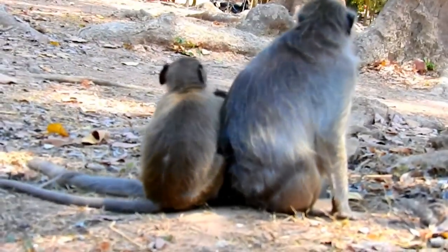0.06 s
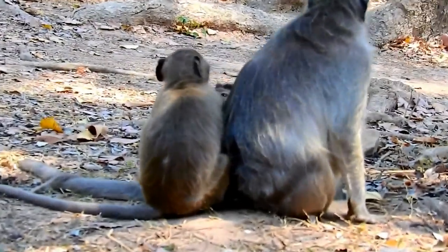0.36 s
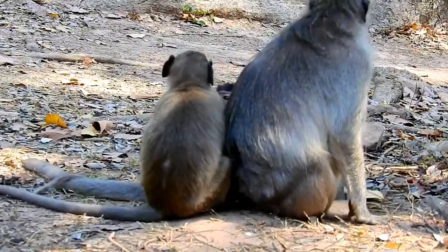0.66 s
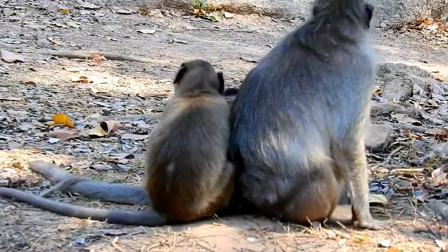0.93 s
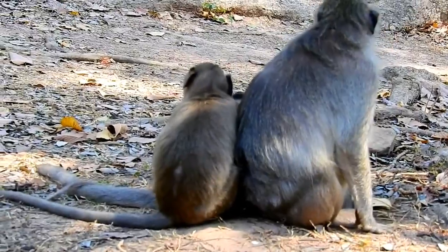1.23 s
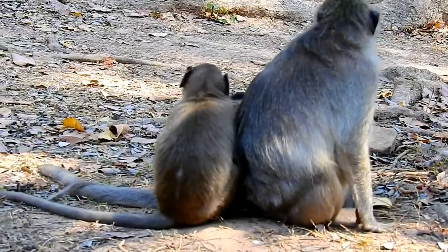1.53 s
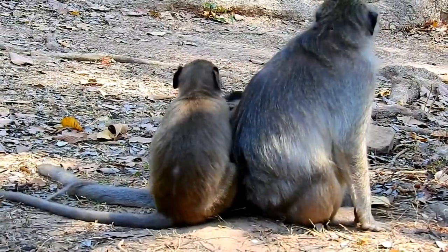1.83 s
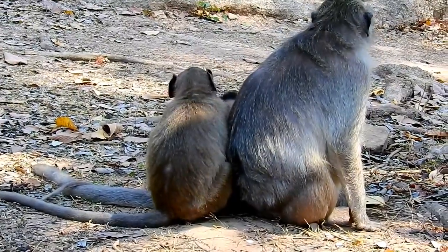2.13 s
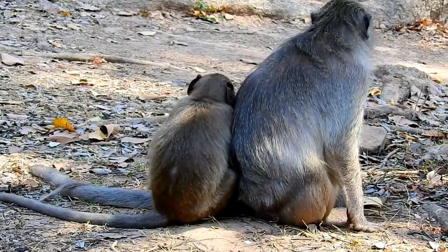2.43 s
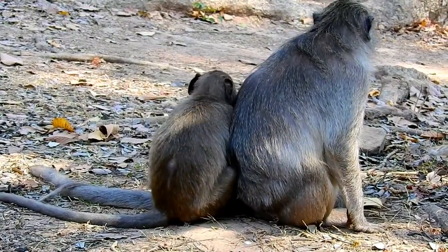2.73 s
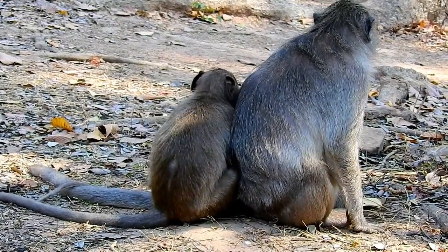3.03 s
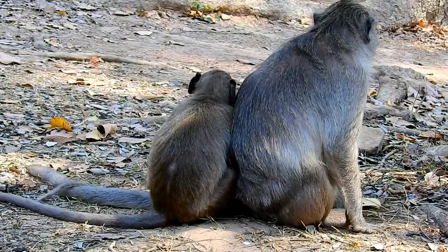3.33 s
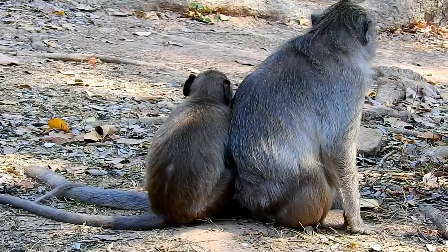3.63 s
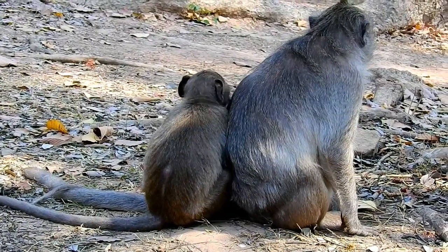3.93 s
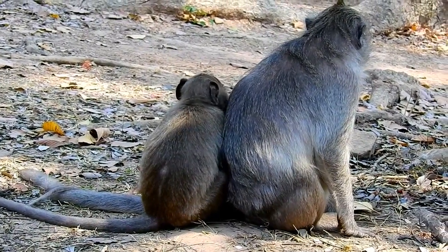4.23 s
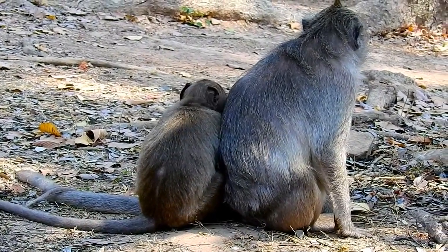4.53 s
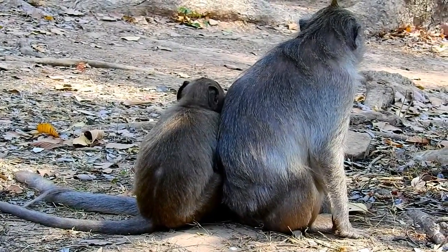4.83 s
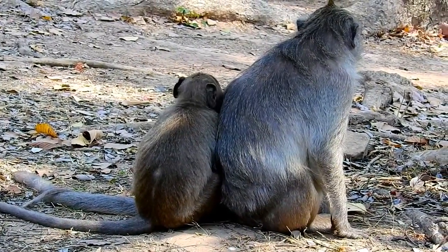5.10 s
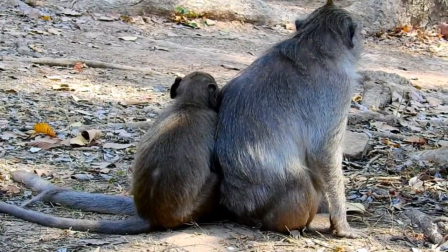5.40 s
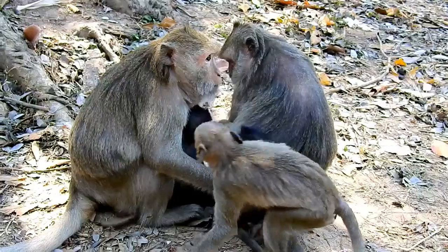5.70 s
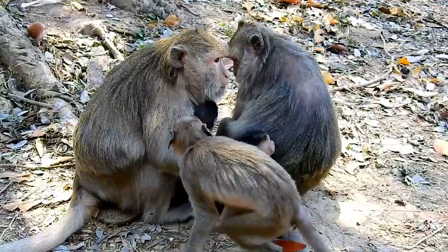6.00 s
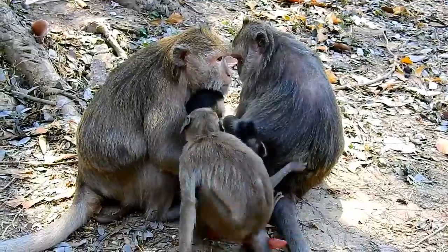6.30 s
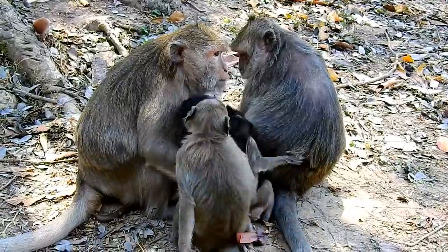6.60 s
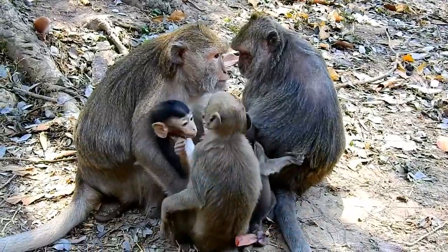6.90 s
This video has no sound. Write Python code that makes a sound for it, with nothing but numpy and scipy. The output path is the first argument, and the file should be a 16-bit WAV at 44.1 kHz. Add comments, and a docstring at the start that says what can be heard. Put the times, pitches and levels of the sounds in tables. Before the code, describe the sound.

A high, steady cicada chorus with distant traffic rumble, joined by one pulsing cicada close by and a brief crackle of leaves.

```python
"""Cicadas drone in a forest, their tymbal clicks blurring among the trees; one whines steadily.
A far road rumbles, an engine recedes, one thin coo sounds and a macaque shifts on dry leaves.
From 3.7 s a near cicada pumps its abdomen, throbbing between a low and a high buzz.
After a short silence the scene goes on at 5.7 s from a second spot, under that cicada.
There a young monkey scuffs the ground and a dry leaf snaps."""
import sys
import numpy as np
from scipy import signal
from scipy.fft import rfft, irfft, next_fast_len
from scipy.io import wavfile
from scipy.ndimage import uniform_filter1d, map_coordinates

SR = 44100
rng = np.random.default_rng(int(sys.argv[2]) if len(sys.argv) > 2 else 0)


def log_audio(samples):
    """Write samples as a 16-bit WAV file to the path given in sys.argv[1]."""
    # one column per channel
    frames = np.atleast_2d(samples).T
    # limit to full scale, then quantise
    limited = np.clip(frames, -1, 1)
    pcm = np.round(limited * 32767).astype(np.int16)
    wavfile.write(sys.argv[1], SR, pcm)


N = 315312


def amp(db):
    return 10 ** (np.asarray(db) / 20)


def unit_rms(x):
    return x / np.sqrt(np.mean(x ** 2) + 1e-20)


def time_s():
    return np.arange(N) / SR


def log_interp(points, hz):
    """Interpolate (freq_hz, value) points on a log axis."""
    freq_hz, values = np.transpose(points)
    return np.interp(np.log(hz + 1), np.log(freq_hz + 1), values)


def gate(start_s, end_s, fade_s):
    """One between two times, with linear fades."""
    return np.clip(np.minimum(time_s() - start_s, end_s - time_s()) / fade_s, 0, 1)


def wobble(rate_hz):
    """Smooth random curve, rate_hz knots a second."""
    knots = rng.standard_normal(4096)
    grid_s = np.linspace(0, N / SR, 4096)
    return np.interp(time_s(), grid_s, map_coordinates(knots, [grid_s * rate_hz], mode="wrap"))


def wave_db(mean_db, swing_db, crest_s, period_s):
    """Slow cosine rise and fall in level."""
    return mean_db + swing_db * np.cos(2 * np.pi * (time_s() - crest_s) / period_s)


def bump(centre_s, half_length_s):
    """Gaussian of height one."""
    return np.exp(-np.minimum(np.abs(time_s() - centre_s) / half_length_s, 10) ** 2)


def filtered(x, response):
    """Apply a gain given as a function of frequency."""
    size = next_fast_len(N + SR // 4, real=True)
    return irfft(rfft(x, size) * response(np.fft.rfftfreq(size, 1 / SR)), size)[..., :N]


def colour(points):
    """Response through (freq_hz, gain_db) points, rolled off below the first."""
    return lambda hz: amp(log_interp(points, hz)) * np.minimum(hz / points[0][0], 1) ** 2


# Stereo width at each spot, side relative to mid: freq_hz, side_db
FIRST_WIDTH = [(60, -20), (100, -24), (180, -22.5), (310, -16.5), (530, -14.5), (910, -12.5), (1560, -13.5),
               (2680, -14), (4610, -8.5), (7940, 0)]
SECOND_WIDTH = [(60, -21.5), (100, -21), (180, -20.5), (310, -16), (530, -13.5), (910, -13), (1560, -12),
                (2680, -15.5), (4610, -8.5), (7940, -2.5)]

def stereo(pair, response, width):
    """Two unrelated signals to filtered left and right, with a mid of rms 1."""
    def gains(hz):
        return response(hz) * np.array([np.ones_like(hz), amp(log_interp(width, hz))])
    mid, side = filtered(pair, gains)
    return np.array([mid + side, mid - side]) / np.std(mid)


# Time at each listening spot: start_s, end_s
SPOT_TIMES = [(0, 5.203), (5.702, 7.2)]

def at_first_spot():
    return time_s() < SPOT_TIMES[1][0]


def tymbal(rate_hz, waver, jitter_s):
    """One cicada's click train, slightly uneven in time and size."""
    cycles = np.cumsum(rate_hz * (1 + waver * (wobble(3) + wobble(40)))) / SR
    position = np.interp(np.arange(1, cycles[-1]), cycles, np.arange(N))
    slip, spread = rng.standard_normal((2, 4096))[:, :len(position)]
    position = np.clip(position + jitter_s * SR * slip, 0, N - 2)
    size = amp(2 * spread)
    index, fraction = position.astype(int), position % 1
    return np.bincount(index, size * (1 - fraction), N) + np.bincount(index + 1, size * fraction, N)


def tree_scatter(clicks, t60_s, direct_ratio):
    """Trunks and leaves scatter clicks into mid and side; the direct sound is in the mid."""
    t = np.arange(SR // 4) / SR
    tail = rng.standard_normal((2, len(t))) * amp(-60 * t / t60_s)
    tail[0, 0] += direct_ratio * np.linalg.norm(tail[0])
    tail /= np.linalg.norm(tail, axis=1, keepdims=True)
    padded = np.pad(clicks, (len(t), 0), "wrap")[None]
    return unit_rms(signal.fftconvolve(padded, tail, "valid", axes=1)[:, :N])


def swarm(rate_hz, direct_ratio, count):
    """Far cicadas, each clicking at its own rate."""
    trains = (tymbal(hz, waver=.04, jitter_s=.0002994) for hz in rate_hz * np.linspace(.8, 1.2, count))
    return sum(tree_scatter(clicks, t60_s=.29, direct_ratio=direct_ratio) for clicks in trains)


# Surges and lulls: centre_s, gain_db, half_length_s
DRONE_SURGES = [(.4, 0.5, 0.29), (1.7, -1, 0.26), (2.301, 2, 0.024), (2.42, 0.5, .04), (2.537, 2.8, 0.02),
                (2.7, 1, 0.032), (3.38, -1, 0.21), (3.899, 1, 0.15), (4.57, 1, 0.039), (5.049, 1, 0.29)]

def surge_db():
    """The droning cicadas briefly push harder or ease off together."""
    return sum(gain_db * bump(centre_s, half_s) for centre_s, gain_db, half_s in DRONE_SURGES)


# Chorus spectra: freq_hz, gain_db
DRONE_SPECTRUM = [(1000, -48), (1400, -27), (1640, -12), (1790, -7.5), (1900, -19), (2150, -19.5),
                  (2500, -19.5), (2900, -13.5), (3150, -6), (3420, 0.5), (3640, -0.5), (3750, -8.5),
                  (4000, -18), (4600, -51)]
SHRILL_SPECTRUM = [(3200, -38), (4020, -5.5), (4130, -6), (4350, -4.5), (4700, -7.5), (5050, -1.5),
                   (5300, -2), (5700, -5), (6400, -3.5), (6950, -2.5), (7300, -8.5), (8100, -16.5),
                   (8800, -25), (11000, -36.5), (15000, -61.5)]
CANOPY_SPECTRUM = [(1000, -36.5), (1450, -17.5), (1750, -8), (2200, -19), (2700, -15), (3300, -2),
                   (3950, -11.5), (4300, -8.5), (5100, -1), (5750, -6), (6850, -2.5), (8700, -26.5),
                   (11000, -38), (15000, -51)]

def cicada_chorus():
    """A droning and a shrill kind swell separately; at the second spot they blend overhead."""
    slow = swarm(rate_hz=230, direct_ratio=.83, count=4)
    fast = swarm(rate_hz=250, direct_ratio=.63, count=6)
    drone_db = wave_db(-33, swing_db=.1, crest_s=.5, period_s=12.5) + surge_db() + .62 * wobble(21.82)
    shrill_db = wave_db(-31.5, swing_db=1.36, crest_s=.24, period_s=5) + .23 * wobble(14)
    canopy_db = wave_db(-26.5, swing_db=-.5, crest_s=8, period_s=6.5)
    drone = amp(drone_db) * stereo(slow, colour(DRONE_SPECTRUM), FIRST_WIDTH)
    shrill = amp(shrill_db) * stereo(fast, colour(SHRILL_SPECTRUM), FIRST_WIDTH)
    canopy = amp(canopy_db) * stereo(fast, colour(CANOPY_SPECTRUM), SECOND_WIDTH)
    return np.where(at_first_spot(), drone + shrill, canopy)


def peaks(rows):
    """Response of narrow peaks with notches between them."""
    return lambda hz: sum((-1) ** k * amp(gain_db) / (1 + ((hz - centre_hz) / half_width_hz) ** 2)
                          for k, (centre_hz, half_width_hz, gain_db) in enumerate(rows))


# Peaks of the whine, most about 100 Hz apart, with notches between them as from a short echo:
# centre_hz, half_width_hz, gain_db
WHINE_PEAKS = [(3477, 40, -4), (3571, 40, 0.5), (3662, 40, -6), (3775, 40, -9), (3885, 40, -10),
               (3970, 40, -9.5), (4330, 70, -13), (5330, 110, -11)]
# Peak of the undertone: centre_hz, half_width_hz, gain_db
UNDERTONE_PEAK = [(1790, 64, 0)]

def whining_cicada():
    """Uneven clicks blur into a fluttering whine; at the first spot an undertone grows an octave below."""
    flutter_hz, flutter_depth_db, rise_db_per_s = 36.85, 2.1, 1.17
    t = time_s()
    clicks = tree_scatter(tymbal(rate_hz=280, waver=.04, jitter_s=.0006), t60_s=.25, direct_ratio=2)
    flutter_db = flutter_depth_db * np.sin(2 * np.pi * flutter_hz * t + 2 * wobble(8))
    whine_db = np.where(at_first_spot(), -33.7, -35.5) + surge_db() + flutter_db
    undertone_db = -48.5 + rise_db_per_s * t + flutter_db
    whine = amp(whine_db) * stereo(clicks, peaks(WHINE_PEAKS), FIRST_WIDTH)
    undertone = amp(undertone_db) * stereo(clicks, peaks(UNDERTONE_PEAK), FIRST_WIDTH)
    return whine + at_first_spot() * undertone


def distant_noise(depth_db):
    """Two noises whose narrow bands come and go, as over a long path."""
    spectra = signal.stft(rng.standard_normal((2, N)), nperseg=2048)[2]
    fading = uniform_filter1d(rng.standard_normal(spectra.shape[1:]), size=3, axis=0)
    fading = uniform_filter1d(fading, size=6, axis=1)
    return signal.istft(spectra * amp(depth_db * unit_rms(fading)), nperseg=2048)[1][:, :N]


# Road spectrum at each spot: freq_hz, gain_db
FIRST_RUMBLE = [(20, -28.5), (40, -13), (58, -3), (80, -4.5), (120, 0.34), (170, -4.5), (260, -11.5),
                (360, -18.5), (600, -26), (800, -23), (950, -27), (1300, -22), (2500, -31), (6000, -68)]
SECOND_RUMBLE = [(20, -33), (45, -9.5), (62, -2.5), (90, 0), (156, -2.5), (200, -7.5), (290, -10),
                 (400, -19.5), (600, -19.5), (820, -19.5), (960, -22), (1300, -24), (2500, -39),
                 (6000, -64.5)]
# Engine tones: start_s, end_s, pitch_hz, level_db
ROAD_TONES = [(0, 5.3, 59, -45.5), (0, 5.3, 123, -47), (0, 2.4, 246, -53), (0, .18, 505, -51),
              (1.18, 1.36, 450, -52), (2.3, 3, 487, -58.5), (3.1, 4.2, 795, -60.5), (5.6, 7.2, 156, -44),
              (6.3, 7.2, 285, -51)]

def far_road():
    """Low traffic rumble with drifting engine tones; higher tones waver more in level."""
    noise = distant_noise(depth_db=2)
    first = stereo(noise, colour(FIRST_RUMBLE), FIRST_WIDTH)
    second = stereo(noise, colour(SECOND_RUMBLE), SECOND_WIDTH)
    rumble_db = wave_db(-36, swing_db=.8, crest_s=-1.5, period_s=12) + .77 * wobble(14)
    road = amp(rumble_db) * np.where(at_first_spot(), first, second)
    lowest_hz = ROAD_TONES[0][2]
    for start_s, end_s, pitch_hz, level_db in ROAD_TONES:
        phase = 2 * np.pi * np.cumsum(pitch_hz * (1 + .014 * wobble(16))) / SR
        waver_db = np.sqrt(pitch_hz / lowest_hz) * wobble(12)
        road += np.sqrt(2) * amp(level_db + waver_db) * gate(start_s, end_s, .041) * np.sin(phase)
    return road


# Engine growl: freq_hz, gain_db
ENGINE_SPECTRUM = [(200, -17), (250, 2.5), (340, -7), (480, -2), (680, -6), (950, -22), (3000, -58)]

def receding_engine():
    """One far engine's uneven growl sinks as it draws away from the first spot."""
    start_db, fade_db_per_s = -48.5, 1.5
    growl = stereo(distant_noise(depth_db=3.6), colour(ENGINE_SPECTRUM), FIRST_WIDTH)
    return amp(start_db - fade_db_per_s * time_s()) * at_first_spot() * growl


# Call contour: time_s, pitch_hz, level_db
COO_CONTOUR = [(.005, 1068, -46), (.04, 1100, -42), (.135, 1102, -43.5), (.175, 1130, -43),
               (.215, 1131, -43.5), (.25, 1114, -47), (.305, 1105, -46), (.355, 1078, -52),
               (.41, 1035, -64)]

def coo():
    """A distant, almost pure call that arches and fades."""
    knots_s, *columns = np.transpose(COO_CONTOUR)
    pitch_hz, level_db = (np.interp(time_s(), knots_s, column) for column in columns)
    phase = 2 * np.pi * np.cumsum(pitch_hz * (1 + .007 * wobble(70))) / SR
    return np.sqrt(2) * amp(level_db + 1.2 * wobble(35)) * gate(0, knots_s[-1], .015) * np.sin(phase)


# Scuffs and snaps: centre_s, level_db, centre_hz, half_length_s
LITTER_STEPS = [(1.344, -45, 502, 0.03), (6.496, -38, 1650, 0.012), (6.526, -32.5, 1270, 0.0036),
                (6.527, -42, 570, 0.019), (6.535, -14, 4800, .0007), (6.538, -34.5, 1100, 0.0027),
                (6.5386, -17, 6200, 0.00079), (6.5908, -21, 5800, 0.0011), (7.096, -49, 1290, 0.023)]

def monkey_steps():
    """Feet scuff soil and snap dry leaves: short puffs of band noise."""
    out = np.zeros(N + SR)
    t = np.arange(-(SR // 8), SR // 8) / SR
    hz = np.fft.rfftfreq(len(t), 1 / SR)
    for centre_s, level_db, centre_hz, half_length_s in LITTER_STEPS:
        band = np.exp(-(np.log((hz + 1) / centre_hz) / .34) ** 2)
        puff = unit_rms(irfft(rfft(rng.standard_normal(len(t))) * band, len(t)))
        start = round(centre_s * SR) - len(t) // 2
        out[start:start + len(t)] += amp(level_db) * puff * np.exp(-(t / half_length_s) ** 2)
    return out[:N]


# Throbbing bouts: start_s, end_s, period_s, taut_start_db, taut_db_per_s, slack_end_db, slack_db_per_s
THROB_BOUTS = [(3.674, 5.206, .1555, -36.5, 3, -32, 13), (5.677, 7.15, .1507, -27, -2.1, -31, -2.5)]
# Body resonances: centre_hz, half_width_hz, gain_db
TAUT_MODES = [(4930, 90, -4.5), (5560, 92, -7.5), (6360, 74, -2.5), (6700, 80, 0), (7260, 180, -9.5),
              (7550, 80, -13.5), (7880, 220, -11.5), (9150, 100, -23.5), (11000, 650, -37),
              (13100, 300, -40.5)]
SLACK_MODES = [(1743, 48, -7.5), (1945, 44, -18), (2887, 60, -8.5), (3120, 80, 3), (3410, 150, 1.5),
               (4320, 200, -4), (5070, 90, -5)]

def throbbing_cicada():
    """A near cicada pumps its abdomen evenly: taut, it clicks faster and rings high; slack, low."""
    taut_rate_hz, slack_rate_hz, bend_hz = 279, 224, 3
    slack_dip, waver_db = .85, .5
    t = time_s()
    taut_gain, slack_gain, effort = np.zeros((3, N))
    for start_s, end_s, period_s, taut_db, taut_db_per_s, slack_db, slack_db_per_s in THROB_BOUTS:
        tension = sum(bump(s, half_length_s=.037) for s in np.arange(start_s, end_s, period_s))
        slackness = np.clip(1 - slack_dip * tension, 0, 1)
        singing = gate(start_s - period_s, end_s, .01)
        effort += singing * tension
        taut_gain += singing * tension * amp(taut_db + taut_db_per_s * (t - start_s))
        slack_gain += singing * slackness * amp(slack_db + slack_db_per_s * (t - end_s))
    taut_clicks = tymbal(taut_rate_hz - bend_hz * (1 - effort), waver=.008, jitter_s=.00002)
    taut = tree_scatter(taut_clicks, t60_s=.14, direct_ratio=.9)
    slack_clicks = tymbal(slack_rate_hz + bend_hz * effort, waver=.017, jitter_s=.00004)
    slack = tree_scatter(slack_clicks, t60_s=.12, direct_ratio=1.1)
    slack_gain *= amp(waver_db * wobble(30))
    high_buzz = taut_gain * stereo(taut, peaks(TAUT_MODES), SECOND_WIDTH)
    low_buzz = slack_gain * stereo(slack, peaks(SLACK_MODES), SECOND_WIDTH)
    return high_buzz + low_buzz


def scene():
    cicadas = cicada_chorus() + whining_cicada() + throbbing_cicada()
    return cicadas + far_road() + receding_engine() + coo() + monkey_steps()


def record(dry):
    """Left microphone slightly stronger in the mids, silence between the spots, top treble cut."""
    cutoff_hz = 15100
    # freq_hz, left_minus_right_db
    balance = [(100, .5), (500, .97), (1500, 1.6), (3400, .87), (5500, 0), (10000, -.3)]
    heard = filtered(dry, lambda hz: amp(np.outer([1, -1], log_interp(balance, hz)) / 2))
    audible = sum(gate(start_s, end_s, .002) for start_s, end_s in SPOT_TIMES)
    return filtered(heard * audible, lambda hz: hz < cutoff_hz)


dry = scene()
out = record(dry)
log_audio(out)
```